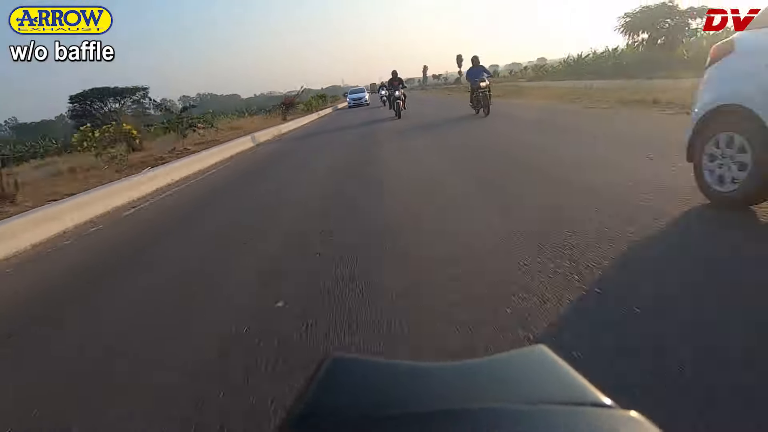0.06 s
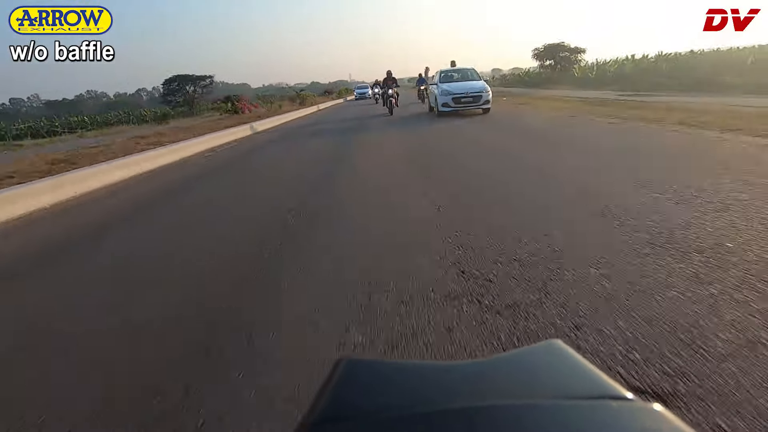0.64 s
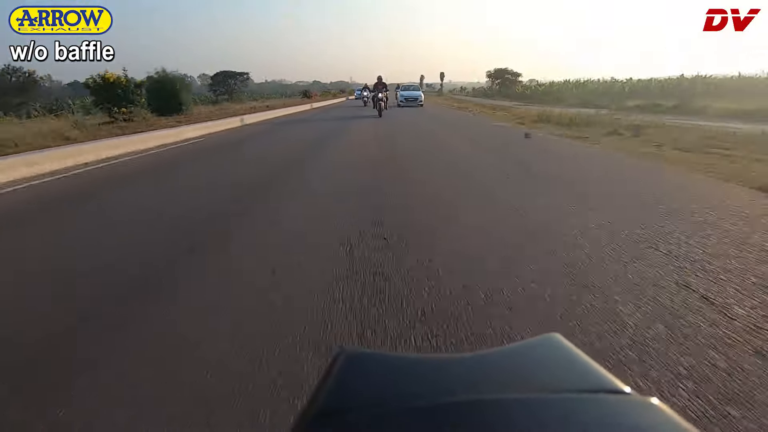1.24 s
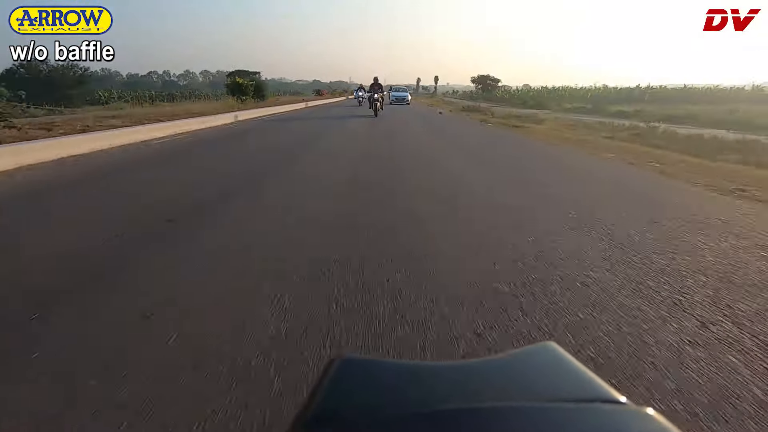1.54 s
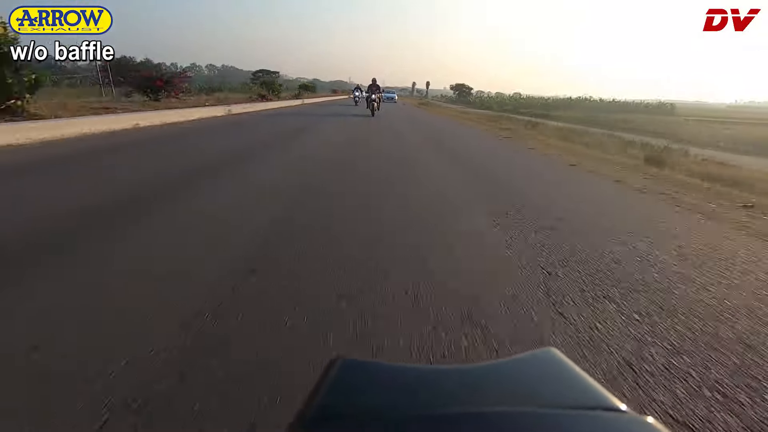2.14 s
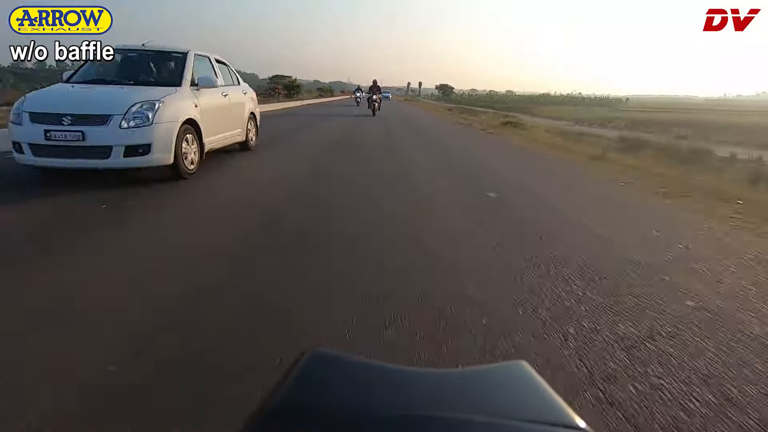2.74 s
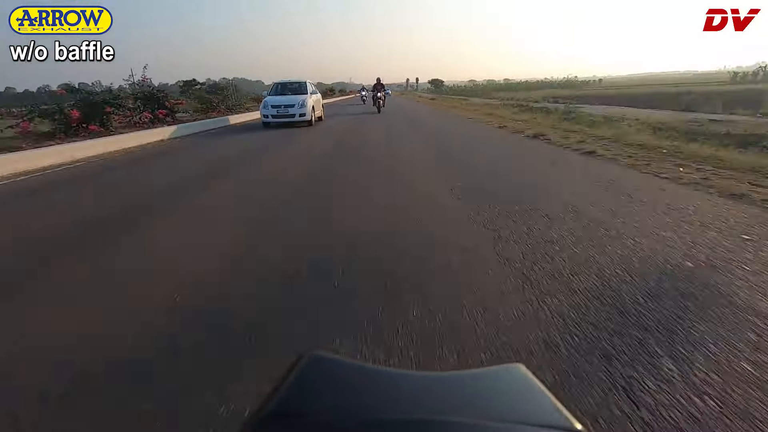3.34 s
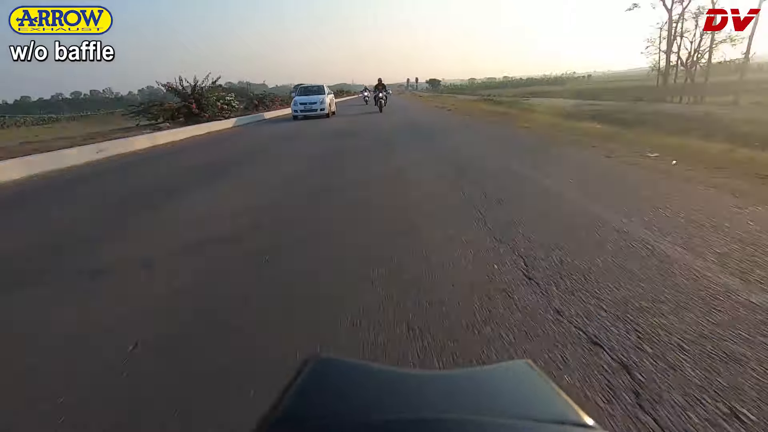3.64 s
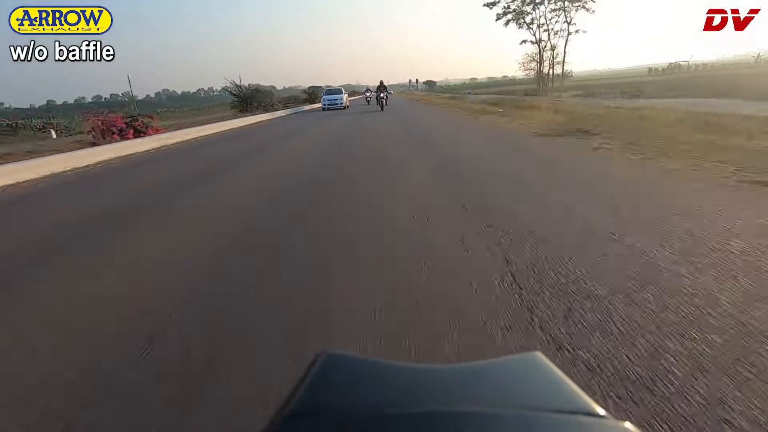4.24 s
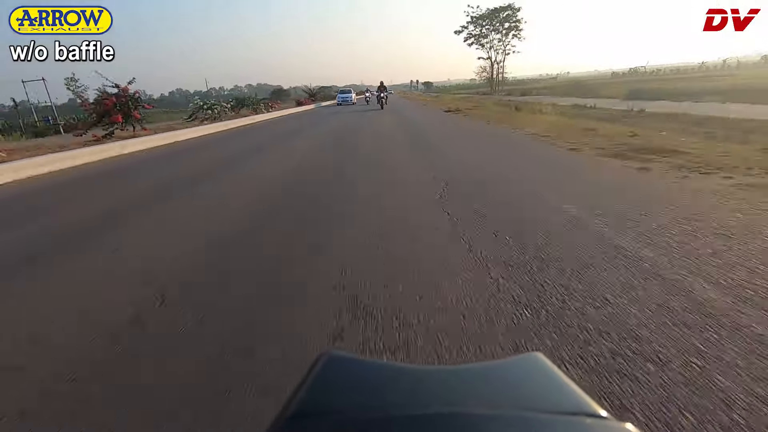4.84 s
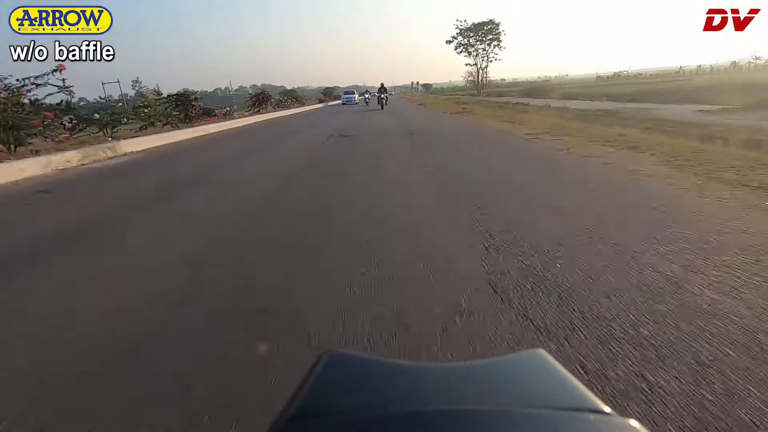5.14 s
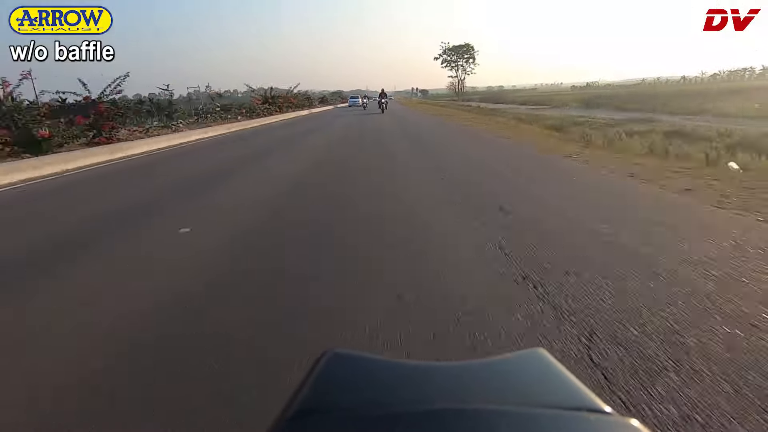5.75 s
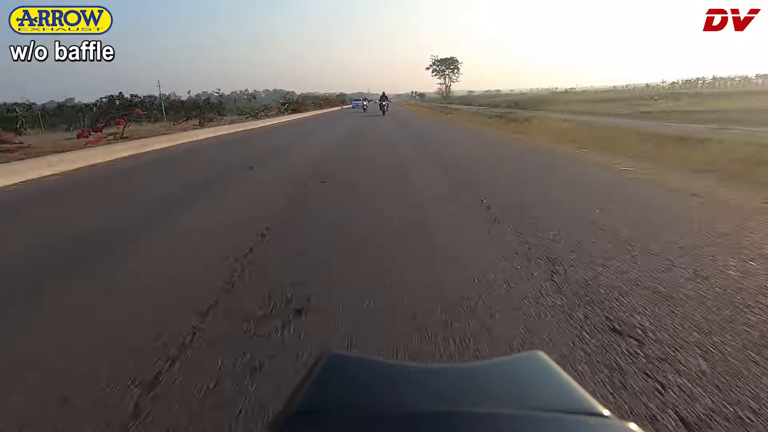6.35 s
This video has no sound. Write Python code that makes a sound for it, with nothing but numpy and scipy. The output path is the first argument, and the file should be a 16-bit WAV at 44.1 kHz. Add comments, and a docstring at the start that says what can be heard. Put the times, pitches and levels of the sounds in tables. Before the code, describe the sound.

A four-cylinder sport motorcycle rides along a road, heard from its tail close to the open exhaust. The engine pulls hard with a loud, booming, barking note that climbs slowly in pitch. It shifts up twice, each time with a short sputter and a drop in pitch. Near the end the throttle shuts, the note turns duller and the scattered sharp cracks come more often. Low wind rumble buffets the microphone throughout.

```python
"""A four-cylinder sport motorcycle with an open exhaust, heard from a camera on its tail.
From the start it pulls hard: each firing pushes gas out of the pipe, which booms, barks and hisses,
while wind buffets the microphone and the camera's limiter holds the boom at one level.
It shifts up with a sputter at about 1.2 s and again at 4 s. From about 5.3 s it coasts on a shut
throttle, and the cracks of unburnt fuel in the pipe, scattered until then, come more often."""
import sys
import numpy as np
from scipy import signal
from scipy.fft import rfft, irfft
from scipy.io import wavfile
from scipy.ndimage import uniform_filter1d, minimum_filter1d

SR = 44100
rng = np.random.default_rng(int(sys.argv[2]) if len(sys.argv) > 2 else 0)


def waveform_to_disk(signal):
    """Save audio, clipped to [-1, 1], as 16-bit WAV at the path in sys.argv[1]."""
    frames = np.transpose(np.atleast_2d(signal))
    scaled = np.clip(frames, -1, 1) * 32767
    samples = np.round(scaled).astype(np.int16)
    wavfile.write(sys.argv[1], SR, samples)


N = 286201
TIME = np.arange(N) / SR
CRUISE_HZ = 250  # a typical pitch of the exhaust note

# One pull for each gear. Each row: when the throttle opens, when it shuts, both in seconds.
PULLS = [(-1, 1.156), (1.24, 3.99), (4.13, 5.265)]
# How hard the engine works while it pulls. Each row: time in seconds, load in dB.
LOAD = [(0, -8), (.75, 3.5), (1.4, -2), (2.5, 0), (3.9, -1.5), (4.2, -6.5), (4.85, 1.5), (5.07, -6),
        (5.2, -13)]


def boom(firings, pitch_hz, lag=0.47, octave_db_per_hz=-0.1135):
    """The gas in the pipe swings once per firing, making a deep note and another an octave above."""
    # Brief dips in the deep note while coasting. Each row: time in seconds, depth from 0 to 1.
    note_dips = [(5.348, 1), (5.868, 0.72), (6.432, 0.84)]
    swing = 2 * np.pi * (firings - lag)
    deep = engine_gain(pull_db=-7.5, slack_db=-12.5, coast_db=-8.5, coast_db_per_s=2.2)
    deep *= 1 + 0.12 * wander(rate_hz=26)
    octave = engine_gain(pull_db=-16.5, slack_db=-34, coast_db=-22.5, coast_db_per_s=-7.5)
    octave *= 1 + 0.062 * wander(rate_hz=89)
    octave *= amp(octave_db_per_hz * (pitch_hz - CRUISE_HZ))
    note = deep * np.cos(swing) + octave * np.cos(2 * swing)
    # The note drops out briefly at these dips and when the throttle shuts.
    half_gap_s, shut_delay_s, shut_depth = .007, 0.0047, 0.71
    gaps = list(note_dips) + [(shuts + shut_delay_s, shut_depth) for opens, shuts in PULLS]
    dip = sum(depth * np.exp(-np.minimum(((TIME - when) / half_gap_s) ** 2, 20)) for when, depth in gaps)
    return np.sqrt(2) * note * np.maximum(1 - dip, 0)


def bark(firings, pitch_hz):
    """Sharp exhaust pulses make a stack of tones that the pipe colours; hard work brightens the sound."""
    # The exhaust's tones; unequal cylinders cause the ones at half multiples. Each row: multiple of
    # the note's pitch, relative level in dB when pulling, level in dB when coasting.
    tones = [(1.5, 0.5, -29), (2.5, -10.5, -45.5), (3, 4.5, -43), (3.5, -8, -36), (4, -1.5, -52),
             (4.5, -17.5, -58), (5, -3.5, -42.5), (5.5, -20.5, -56.5), (6, -23.5, -52), (6.5, -16.5, -53.5),
             (7, 0.5, -52.5), (7.5, -11, -55), (8, -3, -58), (8.5, -21.5, -55), (9, -9, -57)]
    # How the pipe boosts or weakens a tone. Each row: frequency in Hz, gain in dB.
    pipe = [(365, -15.5), (400, -5), (610, -6.5), (680, -13.5), (735, -4), (810, 5.5), (900, 0.5),
            (1010, 5), (1060, -1), (1130, -2.5), (1225, 4), (1300, 4), (1345, 0), (1450, -13), (1690, -1.5),
            (1765, 0.5), (1880, -5.5), (1985, 9.5), (2085, 6), (2140, -6), (2200, 3), (2330, -6.5),
            (2500, 0.5)]
    # The metallic top of the note. Each row: frequency in Hz, gain in dB on top of the whine's level.
    metal = [(2250, -12), (2700, -14), (3050, -15.5), (3450, -15.5), (3900, -23), (5000, -29)]
    pulling, _, coasting, _ = throttle()
    load_db = curve(LOAD)
    middle = pulling * amp(-32.5 + 0.49 * load_db)
    whine = pulling * amp(-39.5 + 0.47 * load_db)
    angle = 2 * np.pi * (firings + .003 * wander(rate_hz=50))
    sound = np.zeros(N)
    for multiple, pull_db, coast_db in tones:
        drive = middle if multiple <= 6 else whine
        level = drive * amp(pull_db + db_at(pipe, multiple * pitch_hz)) + coasting * amp(coast_db)
        shimmer = 1 + 0.15 * wander(rate_hz=16)
        sound += level * shimmer * np.cos(multiple * angle)
    # The metallic top sounds only while pulling, and its half multiples are weaker.
    for multiple in np.arange(9.5, 19.5, .5):
        half_db = -6 if multiple % 1 else 0
        level = whine * amp(db_at(metal, multiple * pitch_hz) + half_db)
        sway = 1 + .3 * wander(rate_hz=2)
        sound += level * sway * np.cos(multiple * angle + rng.uniform(0, np.pi))
    return np.sqrt(2) * sound


def gas_hiss(firings):
    """Gas hisses out in a puff at each firing, strong and weak in turn, and surges a little."""
    # The tone of the rushing gas. Each row: frequency in Hz, relative level in dB.
    spectrum = [(200, -23.5), (480, 1), (640, -7), (790, -1), (950, -7.5), (1250, -8.5), (1450, -11),
                (2000, -12), (2350, -18), (3400, -23.5), (4900, -29.5), (6200, -36), (9800, -48.5),
                (11500, -69.5)]
    strong_weak = 1 + 0.084 * np.cos(np.pi * firings)
    flow = unit(1 + strong_weak * puffs(firings, sharpness=3, spread_db=3))
    level = engine_gain(pull_db=-30.5, slack_db=-38.5, coast_db=-41, follows_load=0.39, coast_db_per_s=-0.2)
    surge = amp(1.1 * wander(rate_hz=11))
    return level * surge * colour(flow * rng.standard_normal(N), spectrum)


def pipe_ringing(pitch_hz, db_per_hz=-0.2062):
    """Uneven burning keeps the pipe's lowest note ringing, most of all between gears and at low revs."""
    # The tone of the ringing pipe. Each row: frequency in Hz, relative level in dB.
    spectrum = [(120, -33.5), (225, -6), (285, 6), (330, -3), (400, -10), (520, -12.5), (650, -19.5),
                (1200, -24.5), (2400, -51), (7000, -89.5)]
    level = engine_gain(pull_db=-26, slack_db=-17.5, coast_db=-26, follows_load=-.4, coast_db_per_s=-4)
    level *= amp(db_per_hz * (pitch_hz - CRUISE_HZ))
    return level * colour(rng.standard_normal(N), spectrum)


def sputter(firings):
    """Fuel burns raggedly as the throttle opens or shuts, making short bursts of rasping puffs."""
    # The bursts. Each row: start in seconds, length in seconds, level in dB.
    bursts = [(1.22, .014, -27), (1.239, .014, -19.5), (1.255, .09, -17.5), (3.988, .06, -28),
              (4.09, .135, -19.5), (5.3, .11, -33)]
    # The tone of the rasp. Each row: frequency in Hz, relative level in dB.
    spectrum = [(200, -13.5), (380, 7), (560, 6), (680, -6.5), (830, 6), (1050, -5), (1230, -3.5),
                (1500, -20.5), (2000, -16.5), (3500, -33), (9000, -69.5), (12000, -69.5)]
    level = np.zeros(N)
    for start, length, db in bursts:
        level += amp(db) * np.sin(np.pi * np.clip((TIME - start) / length, 0, 1))
    flow = unit(0.16 + puffs(firings, sharpness=2, spread_db=0.5))
    return colour(level * flow * rng.standard_normal(N), spectrum)


def cracks(faint_per_s=3.9, faint_length_s=0.0087):
    """Unburnt fuel goes off in the pipe: each crack is one sharp shock inside a short, dying crackle."""
    # The loudest cracks. Each row: start in seconds, relative level in dB, crackle length in seconds.
    loud = [(1.065, -37, .017), (2.152, -28, 0.0072), (2.46, -31, .011), (3.099, -31.5, .019),
            (3.247, -31, .0065), (4.116, -29, 0.0092), (4.431, -24.5, 0.0051), (4.686, -27, 0.0054),
            (5.173, -27, 0.0023), (5.337, -35, .011), (5.357, -27, 0.0061), (5.476, -25.5, 0.0049),
            (5.626, -27, 0.0051), (5.641, -25.5, 0.01), (5.663, -37, 0.018), (5.878, -35, 0.016),
            (5.943, -35, 0.015), (6.112, -32.5, .0057), (6.309, -30, 0.0045), (6.332, -38.5, .005),
            (6.414, -35, 0.0071)]
    # The tone of a crack. Each row: frequency in Hz, relative level in dB.
    spectrum = [(60, 5), (250, 1), (600, 1.5), (1000, 4.5), (2000, -4), (2800, -11), (5000, -22),
                (6500, -30.5), (9500, -34), (11500, -60)]
    # Faint cracks fall at random times among the loud ones.
    tries = rng.random(size=(100, 3))
    faint = [(when * TIME[-1], -44 + 4 * size, faint_length_s)
             for when, size, luck in tries if luck < faint_per_s * TIME[-1] / len(tries)]
    level, shocks = np.zeros(N), np.zeros(N)
    for start, db, length in list(loud) + faint:
        age = np.maximum(TIME - start, 0) / (length / 2)  # the crackle peaks at age 1
        level += amp(db) * age * np.exp(1 - np.minimum(age, 60))
        peak = min(round((start + length / 2) * SR), N - 1)
        shocks[peak] += 0.18 * amp(db) * np.sqrt(length * SR)
    grain = unit(amp(2 * wander(rate_hz=620)))
    crackle = amp(3) * level * grain * rng.standard_normal(N)
    return colour(crackle + shocks, spectrum)


def wind(gust_db=3.5):
    """Air buffets the microphone with a low, lumpy rumble."""
    # The wind's strength before gusts are added. Each row: time in seconds, level in dB.
    strength = [(0, -29.5), (1.7, -28), (4.3, -28), (5.5, -22), (6.49, -26)]
    # The tone of the rumble. Each row: frequency in Hz, relative level in dB.
    spectrum = [(10, -10.5), (28, -6), (65, 0.5), (110, -3.5), (175, -1), (240, -14), (400, -17.5),
                (1000, -29), (4000, -57), (9000, -88)]
    level = amp(curve(strength) + gust_db * wander(rate_hz=21))
    return level * colour(rng.standard_normal(N), spectrum)


def puffs(firings, sharpness, spread_db):
    """One smooth pulse of gas for each firing, each with its own random strength."""
    strengths = amp(spread_db * np.clip(rng.standard_normal(4096), -2.5, 2.5))
    nearest_firing = np.floor(firings + .5).astype(int) + 1
    return strengths[nearest_firing] * np.exp(sharpness * (np.cos(2 * np.pi * firings) - 1))


def throttle(open_s=0.066, shut_s=.014, settle_s=0.26):
    """The shares of pulling, slack between gears and coasting (adding up to 1), and seconds coasted."""
    pulling = np.zeros(N)
    for opens, shuts in PULLS:
        pulling += np.clip((TIME - opens) / open_s, 0, 1) * np.clip(1 - (TIME - shuts) / shut_s, 0, 1)
    coasted_s = np.maximum(TIME - PULLS[-1][1], 0)
    coasting = (1 - pulling) * np.minimum(coasted_s / settle_s, 1)
    return pulling, 1 - pulling - coasting, coasting, coasted_s


def engine_gain(pull_db, slack_db, coast_db, follows_load=0, coast_db_per_s=0):
    """How loud a layer is in each throttle state; it can follow the load and drift while coasting."""
    pulling, slack, coasting, coasted_s = throttle()
    return (pulling * amp(pull_db + follows_load * curve(LOAD))
            + slack * amp(slack_db)
            + coasting * amp(coast_db + coast_db_per_s * coasted_s))


def amp(db):
    """Turns decibels into a number to multiply by."""
    return 10 ** (np.asarray(db) / 20)


def unit(x):
    """Scales a signal to an average power of 1."""
    return x / np.sqrt(np.mean(x ** 2) + 1e-20)


def curve(rows):
    """Joins rows of time and value with straight lines, giving a value for every sample."""
    seconds, values = np.transpose(rows)
    return np.interp(TIME, seconds, values)


def db_at(spectrum, hz):
    """Looks up a spectrum's level at a frequency, blending between rows along a scale of octaves."""
    row_hz, row_db = np.transpose(spectrum)
    return np.interp(np.log(hz + 1), np.log(row_hz), row_db)


def colour(x, spectrum):
    """Gives a sound the tone of a spectrum; white noise keeps its power."""
    hz = abs(np.fft.fftfreq(4096, 1 / SR))
    log_gain = np.log(amp(db_at(spectrum, hz)))
    response = np.exp(np.conj(signal.hilbert(log_gain)))  # rings after a sound, never before it
    ring = np.fft.ifft(response).real[:2048]
    return signal.oaconvolve(x, ring / np.linalg.norm(ring))[:N]


def wander(rate_hz):
    """A smooth random wobble of typical size 1, moving at up to about the given rate."""
    frames = N // 32
    hz = np.fft.rfftfreq(frames, TIME[-1] / frames)
    slow = irfft(rfft(rng.standard_normal(frames)) / (1 + (hz / rate_hz) ** 2), frames)
    return np.interp(TIME, np.linspace(0, TIME[-1], frames), unit(slow))


def scene():
    """The exhaust's layers follow one pitch; cracks and wind are added to them."""
    # The pitch of the exhaust note; it follows the revs and wavers at the second shift.
    # Each row: time in seconds, pitch in Hz.
    pitch = [(0, 249.6), (.3, 254.6), (1, 268.6), (1.155, 270.8), (1.2, 249), (1.36, 242.5), (2, 249.1),
             (3.05, 257.8), (3.6, 266.5), (3.995, 270), (4.11, 225), (4.175, 253), (4.24, 239.9),
             (5.05, 246.4), (5.25, 245), (5.31, 234.4), (5.39, 242), (6.49, 227.2)]
    pitch_hz = curve(pitch) * (1 + .0015 * wander(rate_hz=16))
    firings = np.cumsum(pitch_hz) / SR  # a running count that grows by 1 with each cycle of the note
    note = boom(firings, pitch_hz) + bark(firings, pitch_hz)
    exhaust = note + gas_hiss(firings) + pipe_ringing(pitch_hz) + sputter(firings)
    return (exhaust + cracks() + wind())[None]


def record(dry, ceiling=0.76, drive_db=1, top_hz=12000):
    """The camera's limiter quickly and smoothly turns down peaks, then the highest treble is cut."""
    loud = dry * amp(drive_db)
    allowed = (1 + (loud / ceiling) ** 8) ** (-1 / 8)
    gain = uniform_filter1d(minimum_filter1d(allowed, size=301), size=301)
    treble_cut = signal.firwin(255, top_hz, window=("kaiser", 8), fs=SR)
    return signal.oaconvolve(loud * gain, treble_cut[None], "same")


dry = scene()
out = record(dry)
waveform_to_disk(out)
```